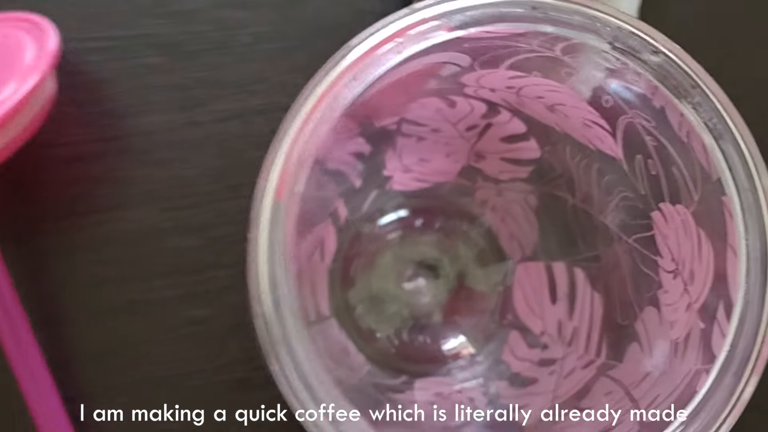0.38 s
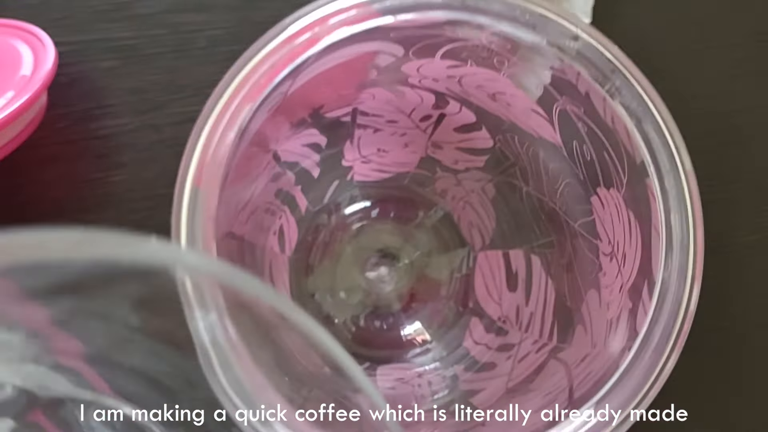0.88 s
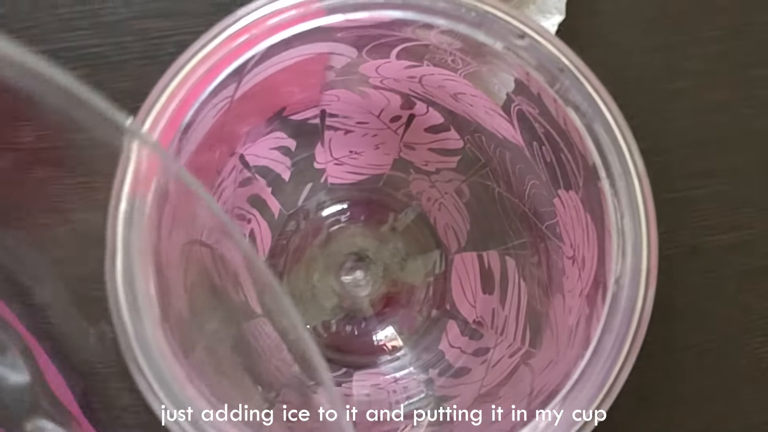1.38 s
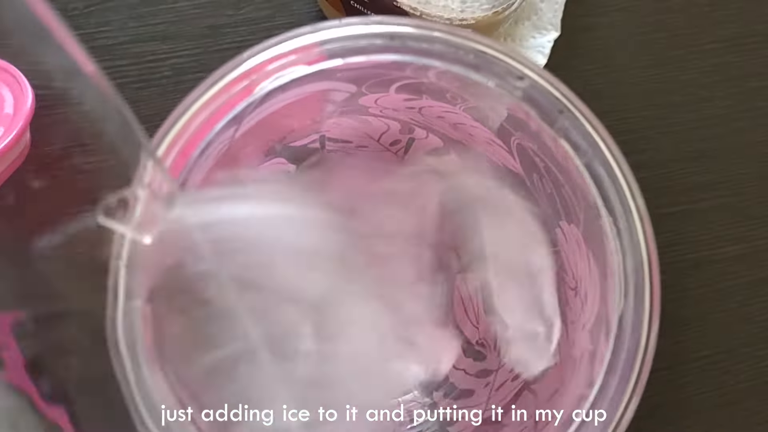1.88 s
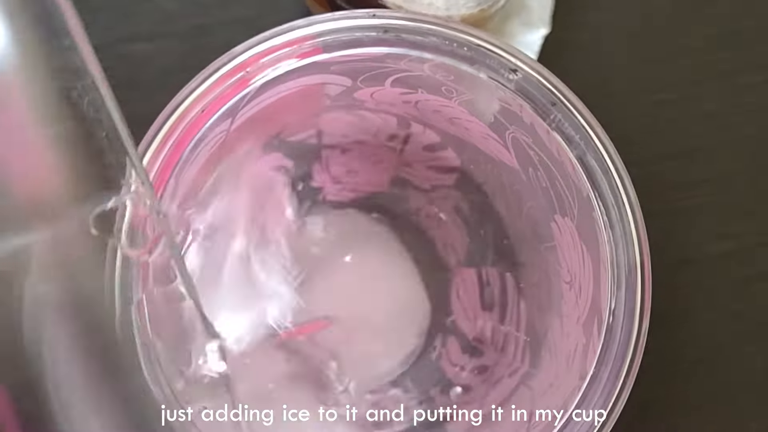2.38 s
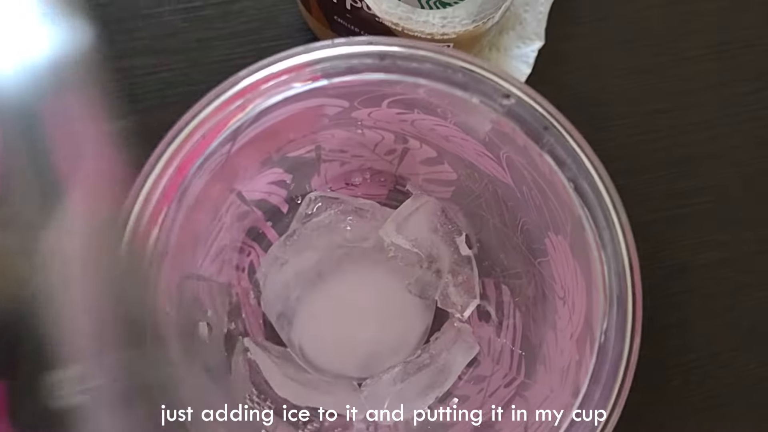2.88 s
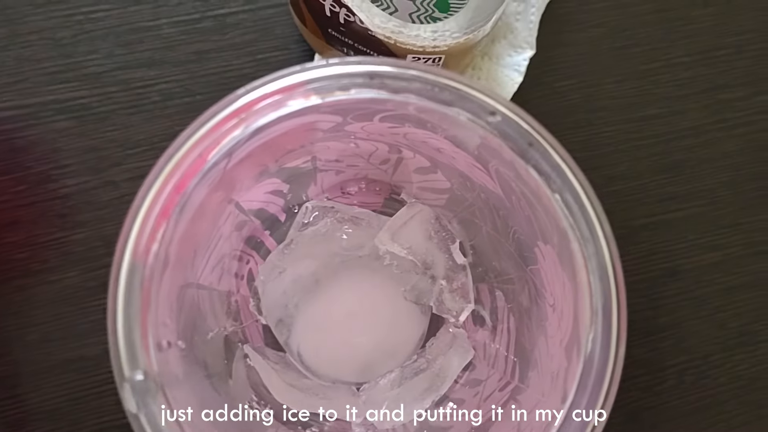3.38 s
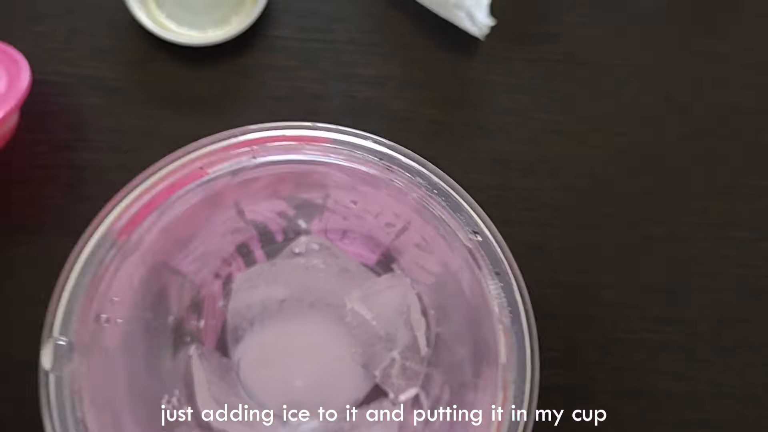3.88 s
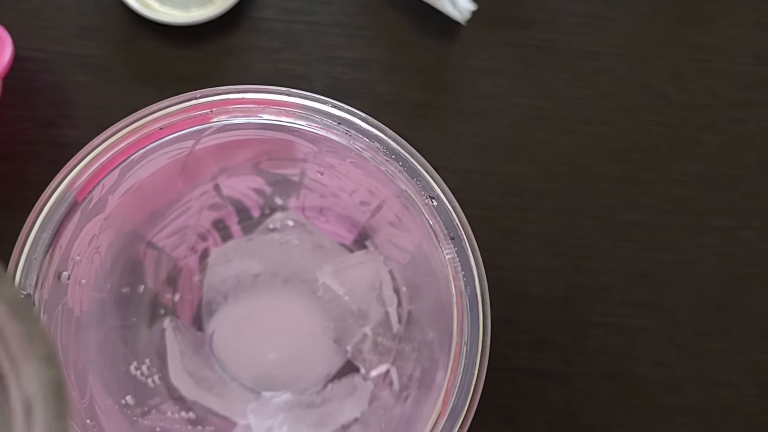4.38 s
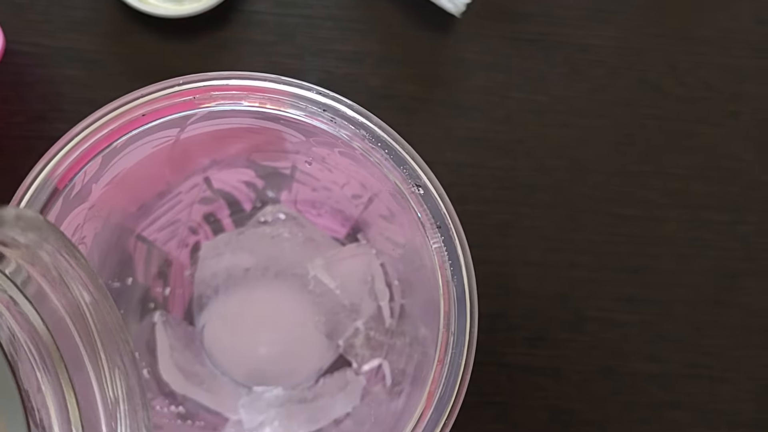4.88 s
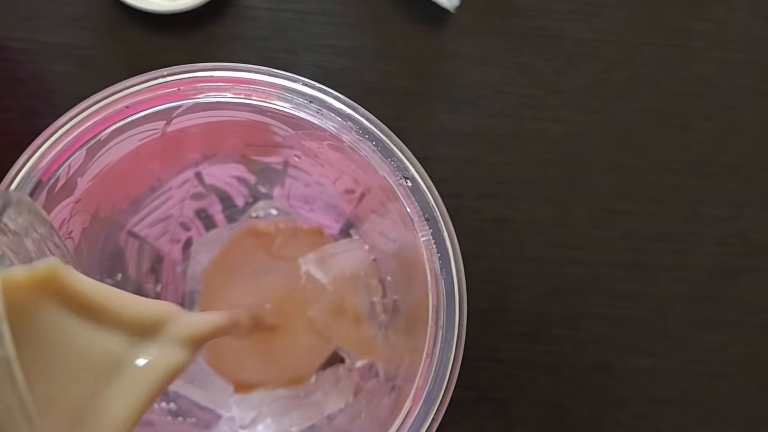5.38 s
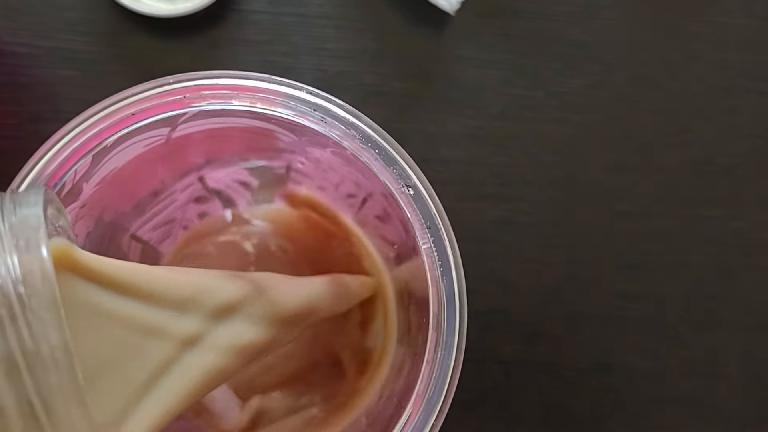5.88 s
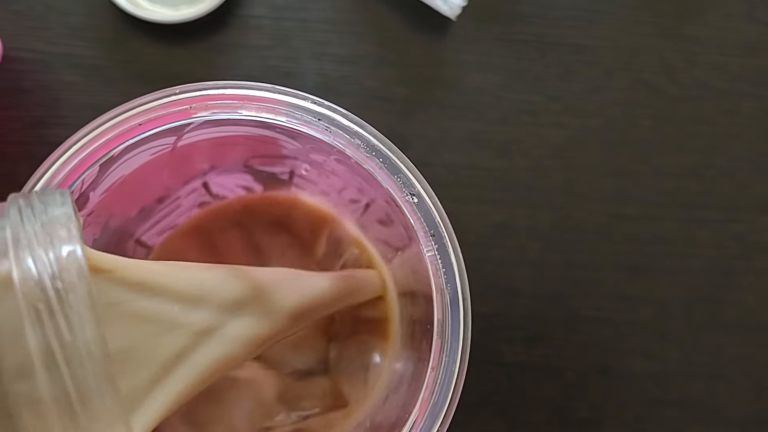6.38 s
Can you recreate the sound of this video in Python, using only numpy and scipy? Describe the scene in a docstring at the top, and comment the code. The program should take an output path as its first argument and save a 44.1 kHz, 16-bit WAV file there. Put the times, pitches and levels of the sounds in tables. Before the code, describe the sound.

Close on a wooden table in a quiet room, faint plastic ticks lead to two dull glass knocks. Ice scrapes out of a glass bowl and crashes into a plastic tumbler in a dense, bright clatter, then stops. After a still pause comes another hollow glass knock, and a drink glugs over the ice, which cracks and shifts. Near stereo phone microphone, little echo.

```python
"""At a wooden table in a quiet room, ice slides out of a glass bowl and clatters into a plastic tumbler.
Bursts of noise make the cracks; fading tones ring as ice, bowl, cup and table. Close by is a phone.
Glass is set down with dull knocks, each a short blow that rings the table and a hollow note.
Then a drink is poured: rising tones glug, while the ice shifts and cracks over a murmur, hiss and hum."""
import sys
import numpy as np
from scipy import signal
from scipy.fft import rfft, irfft, next_fast_len
from scipy.io import wavfile
from scipy.ndimage import uniform_filter1d

SR = 44100
rng = np.random.default_rng(int(sys.argv[2]) if len(sys.argv) > 2 else 0)


def volts_from_decibels(level):
    """Turn decibel levels (scalar or array-like) into linear amplitude factors."""
    exponent = np.asarray(level, float) / 20
    return 10 ** exponent


def dump(signal):
    """Clip the signal to [-1, 1] and save it as 16-bit WAV at the path in sys.argv[1]."""
    limited = np.clip(np.atleast_2d(signal).T, -1, 1)
    pcm = np.round(limited * 32767).astype(np.int16)
    wavfile.write(sys.argv[1], SR, pcm)


N = 287091  # length in samples
T = np.arange(N) / SR


def colour(x, table):
    """Shape the tone through (Hz, dB) points, never sounding early, with a mean power gain of 1."""
    hz, db = np.transpose(table)
    gain = volts_from_decibels(np.interp(np.log(np.arange(513) * SR / 1024 + 1), np.log(hz), db))
    # folding the cepstrum forward makes the filter minimum phase
    cepstrum = irfft(np.log(gain / np.sqrt(np.mean(gain ** 2))))
    cepstrum[1:512] *= 2
    cepstrum[513:] = 0
    response = irfft(np.exp(rfft(cepstrum)))
    return signal.fftconvolve(x, response[None], axes=1)[:, :x.shape[1]]


def fade_rate(t60):
    """Decay per sample for a fade of 60 dB in t60 seconds, at least 2 ms."""
    return np.log(1000) / (max(t60, .002) * SR)


def ring(x, hz, t60):
    """One fading tone, as a struck object rings; a unit blow gives a peak near 1."""
    pole = np.exp(2j * np.pi * hz / SR - fade_rate(t60))
    return signal.lfilter([1], [1, -pole], x).imag


def walk(rate):
    """Random levels, rate of them a second, with a straight slide between; spread near 1."""
    k = int(SR / rate)
    steps = np.repeat(rng.standard_normal(N // k + 1), k)
    return 1.2 * uniform_filter1d(steps, k)[:N]


def add(out, x, s, pan_db=0., lag=0):
    """Mix a sound in at time s; one microphone port can hear it lag samples later."""
    x = np.broadcast_to(x, (2, x.shape[-1]))
    for ch, sign in enumerate((1, -1)):
        i = int(s * SR) + max(sign * lag, 0)
        out[ch, i:i + x.shape[1]] += volts_from_decibels(sign * pan_db / 2) * x[ch, :N - i]


def level(x, db):
    """Scale to an rms level."""
    return x * volts_from_decibels(db) / np.sqrt(np.mean(x ** 2))


def highpass(x, order, hz):
    """Take away the tones below hz."""
    return signal.sosfilt(signal.butter(order, hz, "high", fs=SR, output="sos"), x)


def treble_only(x):
    """Take away everything below 1.7 kHz, leaving only the bright part of a sound."""
    return highpass(x, 3, 1700)


def smear(x, delay_s):
    """The treble comes first and the lower tones trail a millisecond or two behind."""
    size = next_fast_len(x.shape[1] + 1024)
    hz = np.arange(size // 2 + 1) * SR / size
    late = delay_s * (np.sqrt(16000 / np.maximum(hz, 2200)) - 1)
    turn = np.exp(-2j * np.pi * np.cumsum(late) * SR / size)
    return irfft(rfft(x, size) * turn, size)[:, :x.shape[1]]


# Tone of the room. Each row: frequency in Hz, relative strength in dB per Hz.
ROOM_COLOUR = [(40, -34.5), (70, -15), (240, -10), (360, -8), (480, -19.5), (711, -15), (1150, -26.5),
               (3000, -30), (6000, -39), (12000, -42), (15500, -58)]
# Room level over time. Each row: time in seconds, murmur of the house and hiss, both as relative dB.
ROOM_CURVE = [(0, -61, -63), (1.6, -63.5, -66.5), (2.951, -58, -58.5), (3.9, -66, -69), (6.51, -62, -71.5)]


def room_tone():
    """Low murmur of the house, mostly alike in both ports, under a faint hiss that is not."""
    s, low_db, hiss_db = np.transpose(ROOM_CURVE)
    a, b, c, d = colour(rng.standard_normal((4, N)), ROOM_COLOUR)
    low, high = (signal.butter(3, 1200, kind, fs=SR, output="sos") for kind in ("low", "high"))
    sign = np.array([[1], [-1]])  # what is added on the left is taken away on the right
    murmur = level(signal.sosfilt(low, a + 0.41 * b * sign), 2.0)
    murmur = murmur * volts_from_decibels(np.interp(T, s, low_db) + 0.72 * sign)
    hiss = level(signal.sosfilt(high, c + 1.3 * d * sign), 1.1)
    hiss = hiss * volts_from_decibels(np.interp(T, s, hiss_db))
    return murmur + hiss


# Mains hum. The one row: frequency in Hz, middle level in dB.
MAINS_HUM = (59.6, -68.5)


def hum():
    """Mains hum: one low tone whose level wavers, louder on the left."""
    hz, db = MAINS_HUM
    sign = np.array([[1], [-1]])
    return volts_from_decibels(db + 1.0 * walk(17) + 2.3 * sign) * np.sin(2 * np.pi * hz * T)


def crack(t, length_s, alike):
    """A splintering contact: noise that swells until length_s and dies, only partly alike at both ports."""
    a, b, c = rng.standard_normal((3, len(t)))
    swell = (t / length_s * np.exp(1 - t / length_s)) ** 2
    return (alike * a + np.sqrt(1 - alike ** 2) * np.array([b, c])) * swell


# Faint dry ticks. Each row: start in seconds, level in dB before the bass is cut.
DRY_TICKS = [(.1082, -56), (.2433, -55), (.3155, -46), (.3815, -45), (.4416, -43.5), (.603, -59),
             (.698, -45.5), (.716, -40.5), (.7385, -38), (.7652, -39.5), (.8422, -52.5), (1.1011, -52),
             (1.286, -57.5), (1.3725, -51), (2.839, -31.5), (2.898, -40.5), (5.5597, -58), (5.6241, -51.5),
             (5.7488, -52.5), (5.7897, -42.5), (5.7987, -41), (5.8276, -43), (5.8865, -46.5), (5.9015, -41),
             (5.9304, -40), (6.0387, -32.5), (6.0791, -34)]


def ticks():
    """Tiny dry clicks of plastic and ice, treble only."""
    out = np.zeros((2, N))
    for s, db in DRY_TICKS:
        add(out, volts_from_decibels(db) * crack(T[:600], .0011, .5), s)
    return highpass(out, 2, 7470)


# Tone of cracking ice. Each row: frequency in Hz, relative strength in dB per Hz.
ICE_COLOUR = [(900, -25), (1150, -13.5), (1510, -20), (1800, -24.5), (2140, -11.5), (3600, -11),
              (6000, -6.5), (8100, -2), (13000, -9), (15800, -24.5)]
# Broad rings of ice and cup. Each row: frequency in Hz, width in Hz, relative level in dB.
ICE_RINGS = [(2200, 110, -3), (3250, 530, 1), (4210, 520, -1.5), (5100, 440, -1), (7950, 702, 0)]


def clink(t, length_s, hz, share):
    """A crack of which a share rings on in the piece and a little in whatever it met; peak near 1."""
    burst = crack(t, length_s, 0.51)
    wide = colour(burst, ICE_COLOUR)
    other_hz = ICE_RINGS[rng.integers(len(ICE_RINGS))][0]
    tone, other = (treble_only(ring(burst, f, 0.027 * np.sqrt(3000 / f))) for f in (hz, other_hz))
    splinter = level(wide, -1) + level(other, -12)
    sound = np.sqrt(1 - share) * splinter + np.sqrt(share) * level(tone, 0)
    power = uniform_filter1d(np.sum(sound ** 2, axis=0), size=90)
    return sound / np.sqrt(power.max())


LOAD_SHIFT, TABLE_SHIFT = 0.06, 0.02  # ice leaning here and there: wander of wall and table pitch, as shares
SHIFTS_PER_S = 18


def body(x, modes, bend, wander):
    """All tones of an object, each with an ever-changing weight and a pitch that wanders on its own."""
    out = 0
    for hz, db, t60 in modes:
        pitch = hz * bend * (1 + wander * walk(SHIFTS_PER_S))
        turn = np.exp(2j * np.pi * np.cumsum(pitch) / SR)
        push = x * (1 + 0.5 * walk(40))
        swing = signal.lfilter([1], [1, -np.exp(-fade_rate(t60))], push / turn)
        out = out + volts_from_decibels(db) * (turn * swing).imag
    return out


# From DRINK_S seconds the drink damps the cup wall and weighs on the table: change of each push in dB.
DRINK_S, DRINK_WALL_DB, DRINK_TABLE_DB = 5.5, -12, 6
PORT_LAG = 16  # delay between the two ports, in samples
# Tones of the bare table. Each row: frequency in Hz, relative level in dB, time to fade 60 dB in seconds.
TABLE_TONES = [(132, -15, 0.41), (185.5, -13, 0.33), (242, -14, 0.6), (300, -1, 0.37), (361.2, -1, 0.13),
               (414, -15, 0.5)]
# Tones of the cup wall. Each row: frequency in Hz before bending, level in dB, time to fade 60 dB in seconds.
CUP_TONES = [(691, 1.5, 0.055), (805, -1.5, 0.04), (955, 1, 0.071)]
# The lowest wall tone stiffens as ice packs in. Each row: time in seconds, pitch factor.
CUP_BEND = [(2.3, 0.98), (2.4, 1.05), (2.65, 1.07)]


def shaken(table_push, cup_push):
    """The table, damped by the cup, booms alike in both ports; the cup wall reaches them out of step."""
    filled = T > DRINK_S
    table_push = table_push * volts_from_decibels(DRINK_TABLE_DB * filled)
    cup_push = cup_push * volts_from_decibels(DRINK_WALL_DB * filled)
    wall = body(cup_push, CUP_TONES[:1], np.interp(T, *np.transpose(CUP_BEND)), LOAD_SHIFT)
    wall = wall + body(cup_push, CUP_TONES[1:], 0.98, LOAD_SHIFT)
    damped = [(hz, db, .35 * t60) for hz, db, t60 in TABLE_TONES[3:]]
    boom = body(table_push, damped, 1, TABLE_SHIFT)
    both = boom + np.array([wall, np.roll(wall, PORT_LAG)])
    return highpass(both, 4, 240)


RING_SHARE = 0.19  # middle share (0-1) of a dry contact that rings on, for a piece at 3 kHz
WET_RING = .5  # wet pieces keep this part of their share
TABLE_PUSH_DB = -2  # push on the table relative to the push on the cup wall
SPLASH_DB = -11.5  # slap of the drink relative to the listed level of the contact
# Tone of the slapped drink. Each row: frequency in Hz, relative strength in dB per Hz.
SPLASH_COLOUR = [(600, -34.5), (1000, 6.5), (1600, -3.5), (3000, 1), (6000, -18.5)]
# Where the hands are busy. Each row: time in seconds, left minus right in dB at the source.
HANDS_SIDE = [(0, 5), (1.8, -1), (5.5, 2), (6.51, 2)]
# Contacts of ice and plastic. Each row: time of the peak in seconds, relative level in dB, relative length
# in seconds, ring of the piece in Hz, push on cup and table in dB relative to the level.
CONTACTS = [(0.156, -54, 0.013, 3820, -34), (0.287, -44, 0.0027, 2260, -16),
            (0.2977, -42, 0.0033, 5230, -14.5), (0.33, -36.5, 0.002602, 9200, -30),
            (0.346, -34.5, 0.0033, 2400, -23.5), (1.728, -27.5, 0.0041, 11100, -12.5),
            (1.768, -27.5, 0.0066, 2230, -3.5), (1.807, -24.5, 0.016, 5100, -23),
            (1.8253, -10, 0.003122, 8450, -38.5), (1.86, -16.5, 0.0026, 7030, -41),
            (1.876, -23.5, .004, 8500, -30), (1.8908, -14.5, .004, 2200, -34),
            (1.8982, -17, 0.0082, 2240, -29.5), (1.9124, -13.5, 0.0064, 2660, -11),
            (1.928, -18.5, 0.0057, 8400, -10), (1.9446, -11.5, 0.0032, 8440, -29.5),
            (1.949, -17, .0044, 8500, -37), (1.981, -19, 0.016, 8430, -31),
            (2.0082, -9.5, 0.0037, 7000, -30.5), (2.0213, -14, 0.0034, 7560, -23.5),
            (2.0293, -10.5, .0056, 8060, -17.5), (2.045, -16, .0085, 3360, -20.5),
            (2.065, -11.5, 0.006, 3400, -14), (2.079, -12, 0.0026, 7880, -29.5),
            (2.112, -14, 0.018, 7700, -18), (2.1326, -11.5, 0.004722, 7790, -20.5),
            (2.1424, -14, 0.0048, 5000, -22), (2.161, -17.5, .004, 2000, -14),
            (2.19, -12, 0.004425, 7300, -21), (2.198, -15.5, 0.0028, 8530, -24),
            (2.207, -14, 0.00426, 8450, -20), (2.235, -20, .005, 3270, -9), (2.251, -9, 0.0058, 3350, -23),
            (2.276, -12, 0.0091, 8100, -14.5), (2.3155, -15, .003, 9700, -23.5),
            (2.3204, -14.5, 0.0031, 7870, -21), (2.3534, -11, 0.005, 7740, -13),
            (2.38, -10.5, 0.0066, 3250, -23), (2.393, -10.5, 0.013, 3360, -16.5),
            (2.417, -12.5, 0.0043, 5100, -21.5), (2.424, -12.5, 0.0036, 7690, -21),
            (2.451, -22.5, 0.0089, 3450, -4.5), (2.469, -11, 0.0046, 2275, -35),
            (2.543, -14.5, 0.008, 7830, -21.5), (2.55, -15.5, 0.0029, 7600, -26),
            (2.562, -23.5, 0.0061, 8410, -19), (2.585, -23.5, 0.0024, 7940, -7),
            (2.614, -9.5, 0.006, 7930, -22.5), (2.6221, -9, 0.006867, 8470, -13.5),
            (2.6438, -8.5, 0.005805, 7980, -14.5), (2.689, -20, 0.0063, 2790, -7.5),
            (2.702, -22.5, 0.0048, 8700, -29), (2.765, -18.5, 0.0069, 2414, -8),
            (2.795, -18.5, .004, 2500, -11), (2.8034, -12.5, 0.0043, 8050, -23),
            (2.8756, -37, 0.0033, 2026, 0.5), (5.387, -54, 0.0025, 2980, -26),
            (5.574, -44.5, 0.0098, 2210, -21), (5.692, -49, 0.0069, 8270, -35),
            (5.722, -42.5, 0.0043, 2090, -27), (5.945, -21, 0.0019, 3010, -28),
            (5.962, -17, 0.0046, 4760, -54), (5.991, -28.5, 0.0028, 2200, -28),
            (6.1173, -32, 0.011, 2980, -8), (6.259, -39, 0.0062, 2650, -13), (6.282, -14, 0.005, 2780, -57),
            (6.302, -24, 0.003948, 2560, -22), (6.324, -20.5, 0.0046, 3020, -38),
            (6.3682, -12.5, 0.0048, 8300, -43.5), (6.408, -23, 0.0041, 2600, -27),
            (6.486, -30, 0.0034, 3240, -23)]


def clacks():
    """Each contact cracks and rings its piece briefly; the heavy ones push cup and table."""
    out, push = np.zeros((2, N)), np.zeros(N)
    t = T[:2200]
    for s, db, length_s, hz, push_db in CONTACTS:
        wet = s > DRINK_S
        rise_s = 0.49 * length_s
        pan_db = np.interp(s, *np.transpose(HANDS_SIDE)) + 1.6 * rng.standard_normal()
        share = RING_SHARE * (WET_RING if wet else 1)
        share = share * (3000 / hz) ** 0.13 * volts_from_decibels(2.5 * rng.standard_normal())  # big low pieces ring most
        hit = volts_from_decibels(db + 3) * clink(t, rise_s, hz, np.clip(share, 0, .9))
        add(out, hit, s - rise_s - .001, pan_db, PORT_LAG * rng.choice([-1, 1]))
        if wet:
            slap = colour(crack(t, 1.3 * rise_s, 0.44), SPLASH_COLOUR)
            add(out, volts_from_decibels(db + SPLASH_DB) * slap, s - rise_s, pan_db)
        # a blow and a weaker bounce a few milliseconds later
        blows = int(s * SR) + np.array([0, rng.integers(60, 300)])
        push[blows] = volts_from_decibels(db + push_db) * np.array([1, .5])
    return smear(out, 0.00099) + shaken(volts_from_decibels(TABLE_PUSH_DB) * push, push)


SETTLE_DB, SETTLE_S = -21.5, 0.022  # contacts set small pieces rattling: dB re the contact, time to settle
TICKS_PER_S = 350  # tumbling ice
SLIDE_PER_S, SLIDE_START_S, SLIDE_END_S = 2000, 1.6, 1.82  # ice sliding on glass scrapes far denser
# Small pieces scraping and tumbling, one curve for each spell. Each row: time in seconds, level in dB.
RATTLE_SPELLS = [
    [(.29, -51), (.35, -57), (.42, -71.5)],
    [(.69, -57.5), (.79, -64)],
    [(1.64, -82), (1.7, -42.5), (1.8, -41.5), (1.9, -38.5), (2.2, -24.5), (2.4, -25.5), (2.52, -37),
     (2.57, -31.5), (2.6, -39), (2.68, -25), (2.75, -38.5), (2.78, -32), (2.86, -43.5), (2.92, -63)],
    [(5.55, -65.5), (5.88, -62), (5.97, -34), (6.14, -48), (6.2, -49.5), (6.4, -39), (6.51, -42.5)],
]
# Glass bowl under the sliding ice. Each row: frequency in Hz, relative level in dB,
# time to fade 60 dB in seconds.
BOWL_TONES = [(2230, 4, 0.073), (4000, -7, 0.028), (4890, -5, .03), (8420, -4, 0.053)]
# The ring dies down as the bowl empties. Each row: time in seconds, ring in dB relative to the rattle.
BOWL_CURVE = [(1.64, -1), (1.85, -8.5), (2.0, -16), (2.2, -29.5)]


def rattle():
    """Dense little clicks, few large and many small, ring the broad resonances of ice, bowl and cup."""
    db = np.full(N, -120.)  # silent between the spells
    for spell in RATTLE_SPELLS:
        s, spell_db = np.transpose(spell)
        on = (T >= s[0]) & (T <= s[-1])
        db[on] = np.interp(T[on], s, spell_db)
    stirred = np.zeros(N)
    for s, clack_db, *_ in CONTACTS:
        stirred[int(s * SR)] = volts_from_decibels(clack_db + SETTLE_DB)
    settling = signal.lfilter([1], [1, -np.exp(-1 / (SETTLE_S * SR))], stirred)
    db = 20 * np.log10(volts_from_decibels(db) + settling)

    rate = np.where((T > SLIDE_START_S) & (T < SLIDE_END_S), SLIDE_PER_S, TICKS_PER_S)
    sizes = volts_from_decibels(np.minimum(3.5 * rng.exponential(size=N), 11))
    clicks = (rng.random(N) < rate / SR) * np.sqrt(TICKS_PER_S / rate) * sizes
    grit = signal.lfilter([1], [1, -np.exp(-1 / (.0015 * SR))], clicks) * rng.standard_normal((2, N))
    tones = 0
    for hz, width, ring_db in ICE_RINGS:
        # each resonance comes and goes as other pieces meet
        tones = tones + level(ring(grit * volts_from_decibels(6 * walk(35)), hz, 2.2 / width), ring_db)
    table_push, cup_push = level(clicks * rng.standard_normal((2, N)), 0) * volts_from_decibels(db)

    pan_db = np.interp(T, *np.transpose(HANDS_SIDE)) * np.array([[.5], [-.5]])
    mix = level(colour(grit, ICE_COLOUR), 0) + level(treble_only(tones), -6.5)
    ice = volts_from_decibels(db + pan_db) * level(mix, 0)
    bowl = 0
    for hz, ring_db, t60 in BOWL_TONES:
        bowl = bowl + volts_from_decibels(ring_db) * level(ring(grit * volts_from_decibels(5 * walk(30)), hz, t60), 0)
    bowl_db = np.interp(T, *np.transpose(BOWL_CURVE), left=-60, right=-60)
    ice = ice + volts_from_decibels(db + pan_db + bowl_db) * level(treble_only(bowl), 0)
    return ice + shaken(volts_from_decibels(-45) * table_push, volts_from_decibels(-38.5) * cup_push)


KNOCK_END_S = .146  # the knock is cut off after this time
# Glass set against the table. Each row: start in seconds, overall level in dB, hollow note in Hz,
# weight of the note in dB, weight of the crack in dB, clink in Hz, top treble of the crack in dB.
GLASS_KNOCKS = [(0.89, -24, 725.9, 8.5, -0.5, 8580, -4), (1.627, -25.5, 692, 20, -4, 2240, -6),
                (4.733, -26, 800, 17, 7, 8170, 5.5)]


def knocks():
    """Glass on wood: a clink, the boom of the table, a hollow note and a dull echo, all cut off short."""
    out = np.zeros((2, N))
    t = T[:7000]
    for s, db, hz, note_db, crack_db, clink_hz, top_db in GLASS_KNOCKS:
        blow = t / 0.00021 * np.exp(-t / 0.0002) / 22
        boom = 0
        for f, g, t60 in TABLE_TONES:
            boom = boom + volts_from_decibels(g) * ring(np.roll(blow, rng.integers(160)), f, t60)
        note = ring(blow, hz, 0.036)
        note = note + volts_from_decibels(-17.5) * ring(blow, 0.95 * hz, 0.21) + volts_from_decibels(-17.5) * ring(blow, 0.98 * hz, 0.4)
        note = note * volts_from_decibels(np.array([[2.5], [-2.5]]))  # stronger on the left
        tick = smear(clink(t, 0.0015, clink_hz, 0.95 * (2200 / clink_hz) ** 0.99), 0.00095)
        tick = colour(tick, [(9000, 0), (13000, top_db)])
        tick = tick + volts_from_decibels(-17) * (2200 / clink_hz) ** 2 * ring(blow, clink_hz, .12)
        echo = colour(rng.standard_normal((2, len(t))), [
            (130, -7.0), (300, 9.5), (900, 2.0), (1500, -15.5),
            (2500, -11.0), (5000, -21.0), (8500, -9.0), (16000, -32.5)])
        bright = treble_only(echo)  # the treble of the echo dies first
        dull = (echo - bright) * np.exp(-t / 0.061)
        bright = volts_from_decibels(crack_db - 1.5) * bright * np.exp(-t / 0.03)
        echo = np.minimum(t / 0.0017, 1) * (dull + bright)
        sound = volts_from_decibels(7.0) * boom + volts_from_decibels(note_db) * note + volts_from_decibels(crack_db + 2.5) * tick + volts_from_decibels(-9.0) * echo
        sound = highpass(sound, 2, 90)  # a small table radiates no deep bass
        ending = np.clip((KNOCK_END_S - t) / 0.004, 0, 1)
        add(out, volts_from_decibels(db) * sound * ending, s, 1.5)
    return out


# The big block lands. Each row: time in seconds (it begins 5 ms sooner), pitch in Hz, level in dB,
# time to fade 60 dB in seconds.
BLOCK_THUMP = [(2.026, 95, -26, .06)]


def thump():
    """The big block lands: one low tone that fades at once, mostly on the left."""
    out = np.zeros((2, N))
    t = T[:7000]
    for s, hz, db, t60 in BLOCK_THUMP:
        tone = np.sin(2 * np.pi * hz * t) * np.exp(-np.log(1000) * t / t60)
        add(out, volts_from_decibels(db) * tone, s - .005, 8.)
    return out


# A thin whistle sets in. Each row: start in seconds, pitch in Hz, relative width in Hz, middle level in dB.
WHISTLE = [(3.92, 8050, 300, -81.5)]


def whistle():
    """Noise through a narrow resonance gives a thin, wavering whistle."""
    out = np.zeros((2, N))
    for start, hz, width, db in WHISTLE:
        tone = level(ring(rng.standard_normal((2, N)), hz, 10.0 / width), db)
        out = out + (T > start) * tone * volts_from_decibels(2 * walk(26))
    return out


def bubbles(rows, rise):
    """Fading, wobbling tones whose pitch climbs by the share rise while they fade 60 dB."""
    out = np.zeros((2, N))
    t = T[:9000]
    for s, db, hz, t60 in rows:
        phase = 2 * np.pi * hz * (t + rise * t ** 3 / (3 * t60 ** 2))
        wobble = 1 + 4 * uniform_filter1d(rng.standard_normal(len(t)), size=250)
        fade = np.exp(-np.log(1000) * (t / t60) ** 2) * np.minimum(t / 0.004, 1)
        add(out, volts_from_decibels(db) * wobble * np.sin(phase) * fade, s - .002, 1.5, PORT_LAG)
    return out


# Air pockets in the poured drink. Each row: time in seconds (it begins 2 ms sooner), level in dB before the
# wobble, starting pitch in Hz, time to fade 60 dB in seconds.
AIR_POCKETS = [(5.656, -43, 790, .024), (5.722, -43, 800, .024), (5.917, -36, 810, .05),
               (5.954, -25, 810, .032), (6.038, -24, 790, .055), (6.282, -25, 930, .026),
               (6.298, -31, 1010, .034), (6.368, -31, 950, .038), (6.384, -29, 935, .034),
               (6.494, -33, 1000, .055)]


def glugs():
    """Trapped air rings like a bubble, its pitch rising as it nears the surface."""
    return bubbles(AIR_POCKETS, .9)


# The drink slops against the bottom. Each row: time in seconds (it begins 2 ms sooner), level in dB before
# the wobble, starting pitch in Hz, time to fade 60 dB in seconds.
DRINK_SLOPS = [(6.058, -35, 290, .06), (6.085, -37, 262, .14), (6.372, -39, 300, .2)]


def slops():
    """The drink slops against the bottom and the whole cup hums, rising a little in pitch."""
    return bubbles(DRINK_SLOPS, .35)


# Ports of the phone. Each row: frequency in Hz, left minus right in dB before loudness is evened out.
PORT_COLOUR = [(100, -2.5), (700, 5.5), (1300, -2), (2400, 7.5), (4400, -2.5)]


def ports(x):
    """The two ports of the phone colour a near sound in opposite ways."""
    half = np.array(PORT_COLOUR) * [1, .5]
    return np.concatenate([colour(x[:1], half), colour(x[1:], half * [1, -1])])


def walls(x, t60, wet_db):
    """A small furnished room: decaying scattered echoes, duller than the sound itself."""
    t = T[:SR // 2]
    fade = np.exp(-np.log(1000) * t / t60) * np.minimum(t / 0.026, 1)
    echo = rng.standard_normal((2, len(t))) * fade
    echo = colour(echo, [(3000, -0.5), (9000, -4.5), (16000, -18.0)])
    echo = echo / np.sqrt(np.sum(echo ** 2) / 2)
    return volts_from_decibels(wet_db) * signal.fftconvolve(x, echo, axes=1)[:, :N]


def scene():
    """Everything on the table, the echo of ice and drink, and the room."""
    near = ports(clacks() + rattle() + ticks()) + glugs() + slops()
    return near + walls(near, 0.06, -10.5) + knocks() + thump() + room_tone() + whistle() + hum()


def low_pass(x):
    """Removes everything above the highest recorded frequency."""
    return signal.sosfilt(signal.butter(12, 16500, fs=SR, output="sos"), x)


def record(dry):
    """The phone drops the deep bass, cuts the top and clips the loudest peaks."""
    x = highpass(dry, 6, 50)
    x = signal.sosfilt(signal.ellip(8, .2, 60, 16200, fs=SR, output="sos"), x)
    return low_pass(x.clip(-1, 1))


dry = scene()
out = record(dry)
dump(out)
```